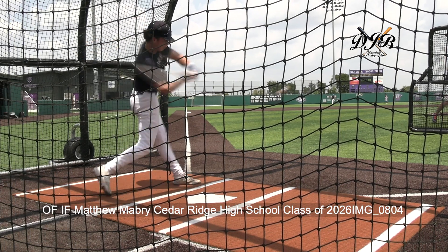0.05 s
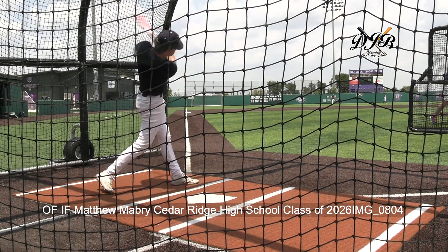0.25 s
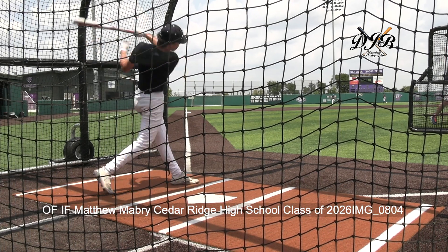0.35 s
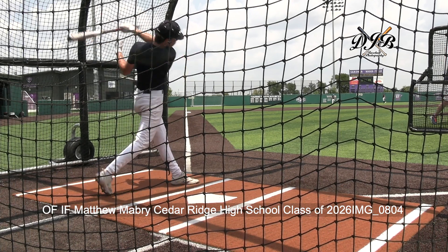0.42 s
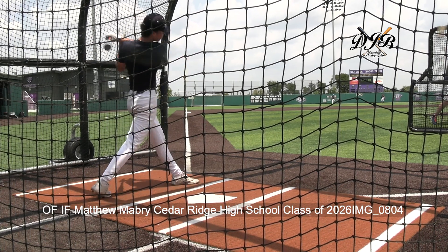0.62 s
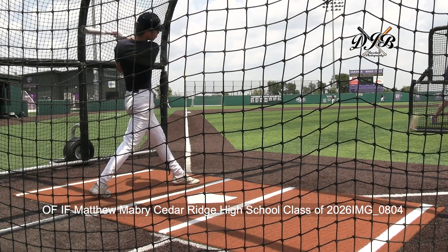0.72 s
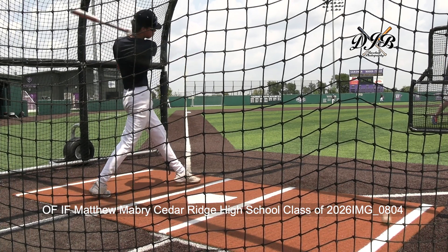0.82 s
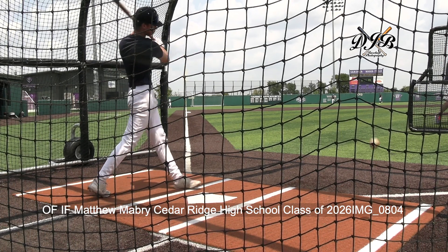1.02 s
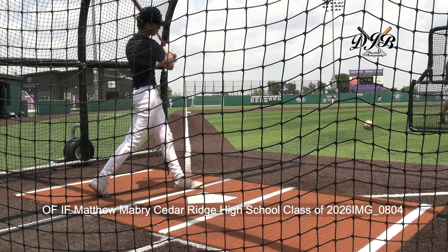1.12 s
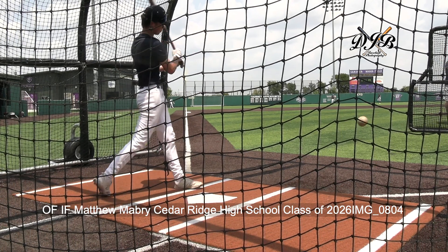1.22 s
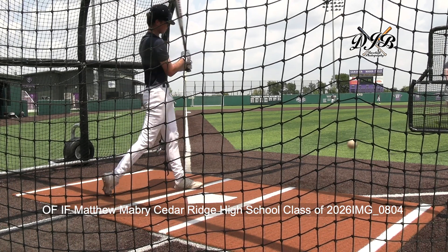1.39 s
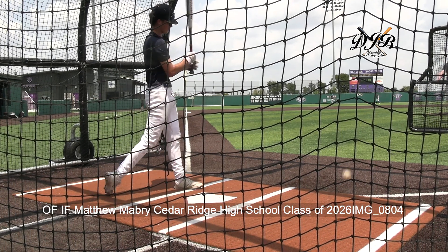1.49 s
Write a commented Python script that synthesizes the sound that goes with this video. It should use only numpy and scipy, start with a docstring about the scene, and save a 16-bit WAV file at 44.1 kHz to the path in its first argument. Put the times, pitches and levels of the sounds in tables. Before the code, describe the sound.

One loud crack of a metal bat on a ball rings out and echoes off nearby walls, a few metres from the microphone. A softer clatter against a screen follows, then a dull thud on turf and a faint rustle in open air.

```python
"""A metal bat hits a pitched ball in an outdoor cage, a few metres from a stereo microphone.
Over a bed of open air a soft swish swells into the crack of the hit. Nearby walls throw the crack
back, and the barrel sings on, its hoop modes bending in pitch and level as the bat swings round.
The ball clatters into a screen and leaves it shuddering, then thuds on turf; a faint rustle follows."""
import sys
import numpy as np
from scipy import signal
from scipy.fft import rfft, irfft
from scipy.io import wavfile
from scipy.ndimage import map_coordinates

SR = 44100
rng = np.random.default_rng(int(sys.argv[2]) if len(sys.argv) > 2 else 0)


def master_out(mix):
    """Clip the mix to full scale and print it as 16-bit PCM to the path in sys.argv[1]."""
    frames = np.transpose(np.atleast_2d(mix))
    ceiling = np.clip(frames, -1, 1)
    pcm = np.round(ceiling * 32767).astype(np.int16)
    wavfile.write(sys.argv[1], SR, pcm)


N = 68355
T = np.arange(N) / SR
LR = np.array([[1.], [-1.]])  # left and right signs: a positive pan leans left
HIT_S = .2082


def undb(db):
    """Decibels to gain."""
    return 10 ** (np.asarray(db) / 20)


def butter(x, order, hz, kind):
    """Butterworth filter."""
    return signal.sosfilt(signal.butter(order, hz, kind, fs=SR, output="sos"), x)


def colour(x, points):
    """EQ a signal along (frequency [Hz], level [dB]) points; rms 1."""
    hz, db = np.array(points).T
    bin_hz = np.maximum(np.arange(N // 2 + 1) * SR / N, 1)
    shaped = irfft(rfft(x) * undb(np.interp(np.log(bin_hz), np.log(hz), db)), N)
    return shaped / np.sqrt(np.mean(shaped ** 2))


def band(hz, octaves):
    """A band of noise with a flat top and steep skirts."""
    edge, skirt = 2 ** (octaves / 2), 4 ** octaves
    points = [(hz / skirt, -50), (hz / edge, 0), (hz * edge, 0), (hz * skirt, -50)]
    return colour(rng.standard_normal(N), points)


def walk(rate_hz):
    """Smooth random wander; rms 1."""
    return colour(rng.standard_normal(N), [(rate_hz / 2, 0), (rate_hz * 2, -30), (rate_hz * 10, -90)])


def fade(start, t60, rise):
    """Envelope with a rounded attack and an exponential decay; times in seconds."""
    age = np.maximum(T - start, 0)
    return (1 - np.exp(-age / rise)) * 1000. ** (-age / t60)


def spread(make, side):
    """Stereo noise from a mid and a weaker side."""
    return make() + side * LR * make()


def place(x, pan_db, lag_ms, delay=0.):
    """Pan and delay a sound; the right channel lags the left."""
    pair = [map_coordinates(x, [(T - s) * SR], order=3) for s in (delay, delay + lag_ms / 1000)]
    return np.array(pair) * undb(LR * pan_db / 2)


def struck(modes, blows, cut_hz):
    """Half-sine pushes ring a table of modes; a small body sends out no bass."""
    body = sum(undb(db) * np.sin(2 * np.pi * hz * T) * 1000. ** (-T / t60) for hz, db, t60 in modes)
    out = np.zeros(N)
    for start, db, contact_ms in blows:
        push = np.sin(np.pi * np.clip((T - start) * 1000 / contact_ms, 0, 1))
        out += undb(db) * signal.fftconvolve(push / push.sum(), body)[:N]
    return butter(out, 3, cut_hz, "high")


def shudder(start, bands):
    """Noise bands swell and die away behind an impact."""
    return sum(undb(db) * band(hz, octaves) * fade(start, t60, rise)
               for hz, octaves, db, rise, t60 in bands)


def brush(curve, spectrum):
    """Soft, grainy noise rides a level curve; the tilt trades lows for highs."""
    times, db, tilt_db = np.array(curve).T
    outside_s = np.maximum(np.maximum(times[0] - T, T - times[-1]), 0)
    level = undb(np.interp(T, times, db) - 1000 * outside_s)
    noise = spread(lambda: colour(rng.standard_normal(N) * undb(2 * walk(200)), spectrum), side=.4)
    lows = butter(noise, 1, 1420, "low")
    tilt = undb(np.interp(T, times, tilt_db))
    return (lows / tilt + (noise - lows) * tilt) * level


def air():
    """Open-air bed: half-octave bands flicker independently; the bass is alike on both sides."""
    # spectrum of the outdoor floor (frequency [Hz], relative density [dB])
    spectrum = [(25, -23.5), (75, -6), (150, -5.5), (350, -11), (800, -16.5), (3000, -25), (7000, -36),
                (11000, -41), (15000, -67)]
    at_hz, density_db = np.array(spectrum).T
    out = 0
    for hz in 25 * 2 ** np.arange(0, 9.5, .5):
        band_db = np.interp(np.log(hz), np.log(at_hz), density_db) + 10 * np.log10(hz)
        flicker_db = -4 * walk(1.6)
        out += undb(band_db + flicker_db) * spread(lambda: band(hz, .44), side=min(hz / 2560, .6))
    return out * undb(-58.5) / np.sqrt(np.mean(out ** 2))


def swish():
    """A breathy swell that brightens, then darkens into the hit."""
    # ride of the swish (time [s], level [dB], treble tilt [dB])
    curve = [(0, -69.5, -9), (.075, -51.5, -5), (.11, -50, 4), (.15, -51, -2), (.19, -51.5, -3.5),
             (.207, -47, -12.5)]
    # its tone colour (frequency [Hz], relative density [dB])
    spectrum = [(120, -43), (300, -3), (1200, -7), (3000, -7), (6000, -19.5), (12000, -43.5)]
    return brush(curve, spectrum)


def rustle():
    """A faint rustle that trails off after the thud."""
    # ride of the rustle (time [s], level [dB], treble tilt [dB])
    curve = [(.96, -51, 0.99), (1.04, -50.5, -0.23), (1.1, -54, -2.3), (1.16, -59, -1.3), (1.3, -68, -0.57)]
    # its tone colour (frequency [Hz], relative density [dB])
    spectrum = [(100, -17.5), (200, -11), (800, -12.5), (3000, -18.5), (4000, -27.5), (6000, -30),
                (12000, -49)]
    return brush(curve, spectrum)


def turf_thud():
    """The ball lands on turf: a damped thud, topped by the slap of its hide."""
    # modes of the ball on turf (frequency [Hz], level [dB], t60 [s])
    turf = [(257.3, 4.5, 0.015), (576, 1, 0.017), (976, 7, 0.011)]
    # bounces and their echoes (time [s], level [dB], contact [ms])
    thuds = [(0.9354, -9.5, 1.74), (0.96, -38, 1.8), (0.985, -42, 2.4), (1.001, -32.5, 2.9)]
    # swell behind the thud (centre [Hz], width [octaves], level [dB], rise [s], t60 [s])
    bloom = [(220, 0.77, -43.5, 0.044, 0.5), (3210, 0.054, -48.5, 0.12, 0.6)]
    # modes of the hide (frequency [Hz], level [dB], t60 [s])
    hide = [(2000, 4.5, 0.002), (4440, -0.5, 0.0014)]
    # blow on the hide (time [s], level [dB], contact [ms])
    slap = [(0.9366, -27.5, 0.069)]
    return struck(turf, thuds, cut_hz=189) + struck(hide, slap, cut_hz=1060) + shudder(thuds[0][0], bloom)


def screen_clatter():
    """The ball runs into a screen: quick knocks, a bright clatter and a low shudder."""
    # modes of the screen (frequency [Hz], level [dB], t60 [s])
    modes = [(331, 0, 0.043), (631.5, 0, 0.037), (1250, 5.5, 0.015), (1980, 3.5, .008)]
    # knocks of the ball (time [s], level [dB], contact [ms])
    knocks = [(0.3612, -24.5, 0.78), (0.3647, -18, 0.66), (0.3691, -22, 0.93), (0.375, -6.5, 1.6),
              (0.493, -34.5, 0.98), (.515, -33.5, 1.45)]
    # swell behind the first knock (centre [Hz], width [octaves], level [dB], rise [s], t60 [s])
    bloom = [(593, 0.99, -17, 0.0094, 0.12), (446, 0.75, -37, 0.078, 0.59)]
    start = knocks[0][0]
    knocking = place(struck(modes, knocks, cut_hz=402), pan_db=.3, lag_ms=.017)
    clatter = spread(lambda: band(2600, 1.45), side=.53) * undb(-20.5 + 2.5 * walk(500))
    return knocking + clatter * fade(start, t60=.052, rise=.001) + shudder(start, bloom)


def diffuse_tail():
    """Scattered sound: a broad wash from the crack and narrow bands from the barrel's ring."""
    # tail of the crack (centre [Hz], level [dB], t60 [s])
    wash = [(358.2, -43.5, 0.39), (690, -36, 1), (1190, -32.5, 0.83), (2300, -30.5, 0.93),
            (4100, -34.5, 0.64), (6470, -41.5, 0.6), (9000, -51.5, .45)]
    # scattered ring (centre [Hz], width [octaves], level [dB], t60 [s])
    scatter = [(2554, .04, -31, 1), (2740, .07, -25, 0.91)]
    out, side = 0, .55
    for hz, db, t60 in wash:
        noise = spread(lambda: band(hz, .77), side * min(hz / 1500, 1))
        out += undb(db) * noise * fade(HIT_S, t60, rise=.004)
    for hz, octaves, db, t60 in scatter:
        out += undb(db) * spread(lambda: band(hz, octaves), side) * fade(HIT_S, t60, rise=.022)
    return out


def slapbacks(crack):
    """Nearby walls and the ground each throw back one band of the crack."""
    # slapbacks (delay [s], gain [dB], centre [Hz], width [octaves], pan [dB])
    echoes = [(0.0466, 0, 3168, 1.31, 3), (0.0482, -9, 1948, 0.36, 6), (0.059, 4.5, 8460, 1.2, 4.5)]
    out = 0
    for delay, db, hz, octaves, pan_db in echoes:
        edges = hz * 2 ** (np.array([-octaves, octaves]) / 2)
        out += place(undb(db) * butter(crack, 2, edges, "band"), pan_db, lag_ms=.017, delay=delay)
    return out


def barrel_ring():
    """The barrel's upper modes ring down, each a close pair that beats and wavers."""
    # mode pairs (frequency [Hz], level [dB], time of a beat crest [s], beat rate [Hz], t60 [s])
    modes = [(2635, -25, .27, 17, 0.46), (2794, -22.5, 0.33, 34, 0.39), (2880, -21, .24, 14, 0.48),
             (3816, -23, .263, 19.5, .45), (5126, -25, .226, 19.5, .42), (7190, -33, .242, 20.5, .3),
             (10680, -38, .214, 42, 0.26), (13285, -41.5, .24, 15, .15), (14105, -39.5, .222, 15, .15)]
    ring, partner_gain = 0, .7
    for hz, db, crest_s, beat_hz, t60 in modes:
        level = undb(db + 2 * walk(40)) * fade(HIT_S, t60, rise=.002)
        beat = (1 + partner_gain * np.exp(2j * np.pi * beat_hz * (T - crest_s))) / (1 + partner_gain)
        phase = 2 * np.pi * hz * T + .5 * walk(40)
        ring += level * np.imag(beat * np.exp(1j * phase))
    return place(ring, pan_db=1.7, lag_ms=.0033)


def hoop_mode(levels, path):
    """One singing mode: pitch, level and pan follow the swinging barrel; scattered copies roughen it."""
    level_s, db = np.array(levels).T
    path_s, hz, pan_db = np.array(path).T
    stereo_phase_rad = .53
    phase = 2 * np.pi * np.cumsum(np.interp(T, path_s, hz)) / SR + LR * stereo_phase_rad / 2
    rough = undb(-6) * np.array([walk(87.5) + 1j * walk(87.5) for _ in LR])
    tone = np.sqrt(2) * np.imag((1 + rough) * np.exp(1j * phase))
    gain = undb(np.interp(T, level_s, db) + LR * np.interp(T, path_s, pan_db) / 2)
    gate = (T > HIT_S) * np.clip((level_s[-1] - T) * 20, 0, 1)
    return tone * gain * gate


def barrel_song():
    """Two hoop modes of the barrel sing on as the bat swings round."""
    # level of each mode as the bat turns (time [s], level [dB])
    low_levels = [(.209, -21.5), (.222, -10), (.258, -22), (.272, -14), (.292, -25.5), (.315, -20),
                  (.353, -23.5), (.365, -60), (.39, -31), (.473, -47), (.505, -95), (.531, -67), (.65, -79)]
    high_levels = [(.209, -27), (.25, -26.5), (.283, -24.5), (.33, -28.5), (.367, -22.5), (.397, -36),
                   (.433, -24.5), (.48, -29), (.503, -38), (.521, -42.5), (.54, -47.5), (.72, -70)]
    # glide and stereo path of each mode (time [s], pitch [Hz], pan [dB])
    low_path = [(.23, 2516, 2.5), (0.282, 2536, 2.5), (0.322, 2553, -4.5), (.47, 2575, -0.5)]
    high_path = [(0.243, 2782, 2.3), (0.293, 2692, 4.1), (0.38, 2727, 4), (0.518, 2724, 7.5)]
    return hoop_mode(low_levels, low_path) + hoop_mode(high_levels, high_path)


def bat_crack():
    """Bat meets ball: a 0.2 ms blow rings short modes under a snap of noise."""
    # body of the crack (frequency [Hz], level [dB], t60 [s])
    modes = [(850, 2, 0.0057), (1140, -8.5, 0.009), (2070, -11, 0.022), (2800, 7.5, 0.00302),
             (3813, -9.5, 0.025)]
    # tone colour of the snap (frequency [Hz], relative density [dB])
    spectrum = [(500, -20), (2000, 1.5), (3500, -11.5), (7000, -16.5), (14500, -50.5)]
    snap = undb(-17) * colour(rng.standard_normal(N), spectrum) * fade(HIT_S, t60=.0399, rise=.0001)
    return struck(modes, [(HIT_S, 0, .2)], cut_hz=680) + snap


def scene():
    """Mix the bat and its reflections with the ball's impacts and the soft noise layers."""
    crack = bat_crack()
    bat = place(crack, pan_db=.7, lag_ms=.0077) + barrel_ring()
    reflections = slapbacks(crack) + diffuse_tail()
    return bat + reflections + barrel_song() + screen_clatter() + turf_thud() + swish() + rustle() + air()


def record(dry):
    """The microphone dulls the top treble and rounds the loudest peak; the recorder cuts bottom and top."""
    dulled = butter(dry, 4, 12730, "low")
    rounded = dulled / (1 + np.abs(dulled) ** 4) ** (1 / 4)
    trimmed = butter(rounded, 2, 45, "high")
    return signal.sosfilt(signal.ellip(8, .2, 80, 15500, fs=SR, output="sos"), trimmed)


dry = scene()
out = record(dry)
master_out(out)
```